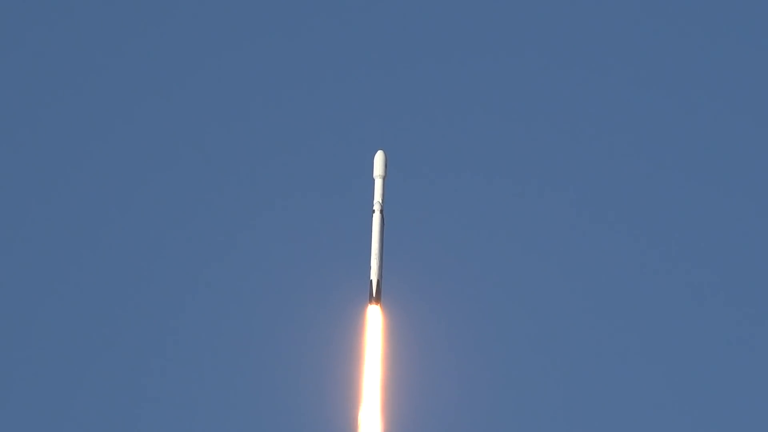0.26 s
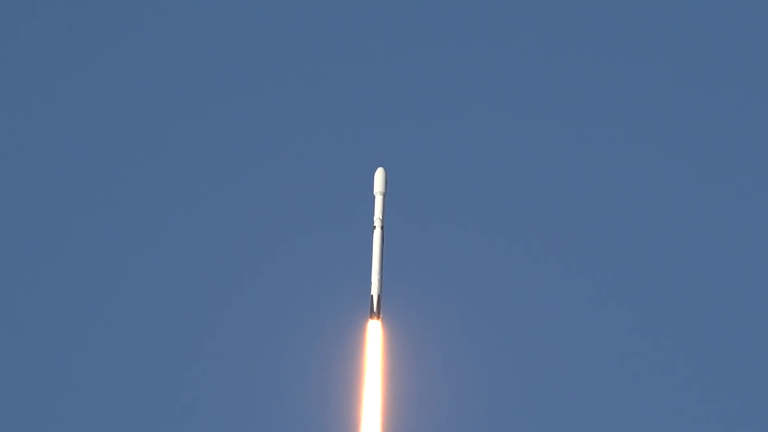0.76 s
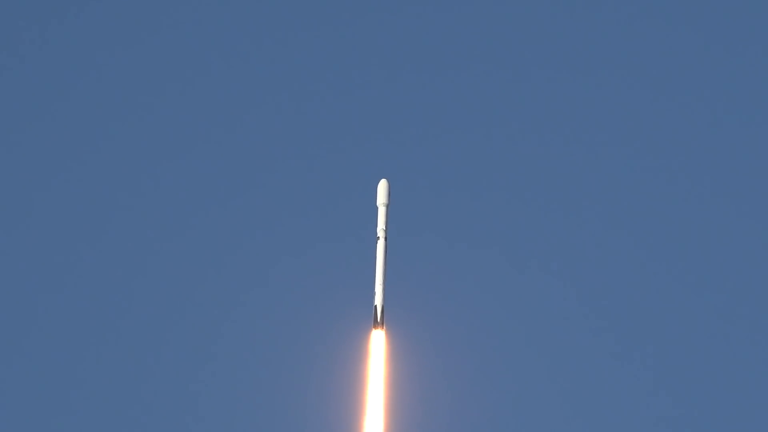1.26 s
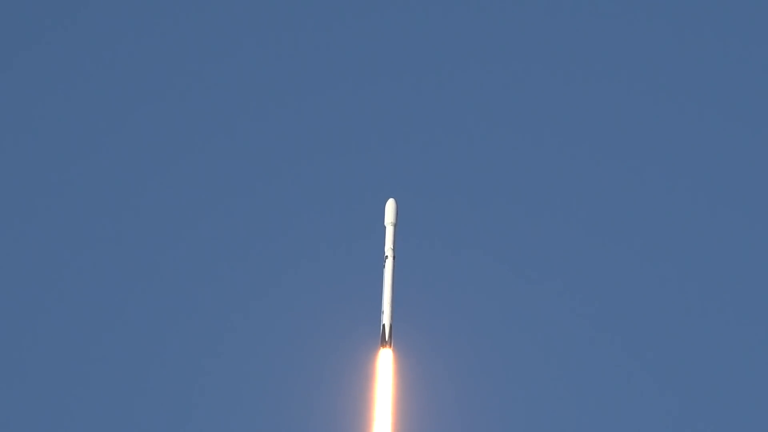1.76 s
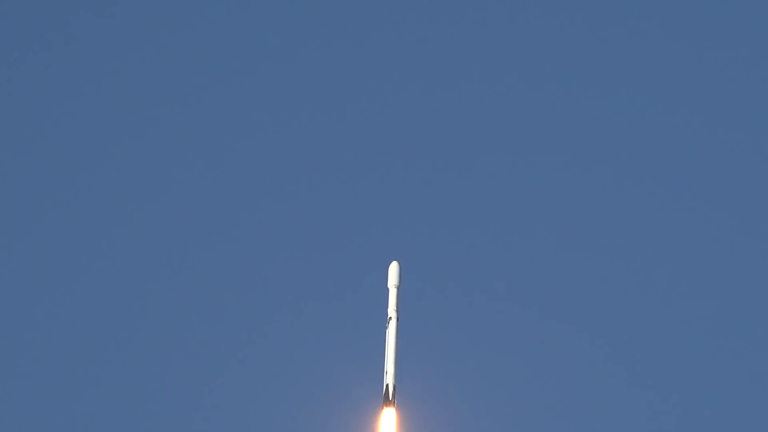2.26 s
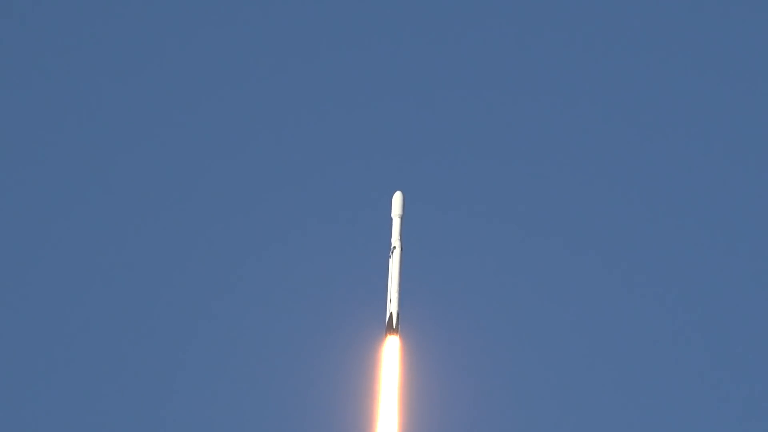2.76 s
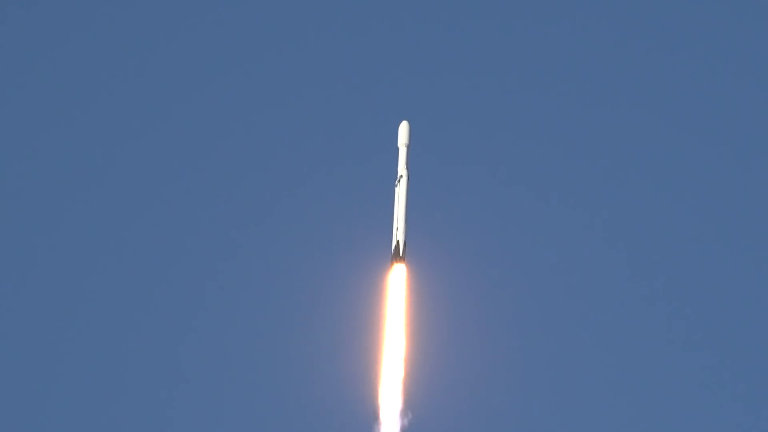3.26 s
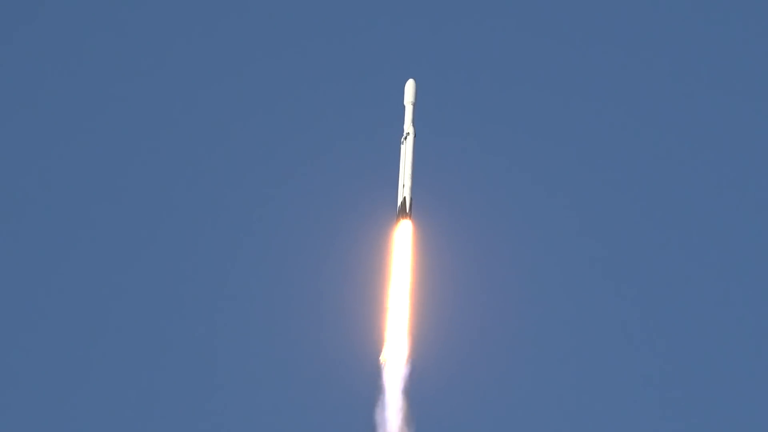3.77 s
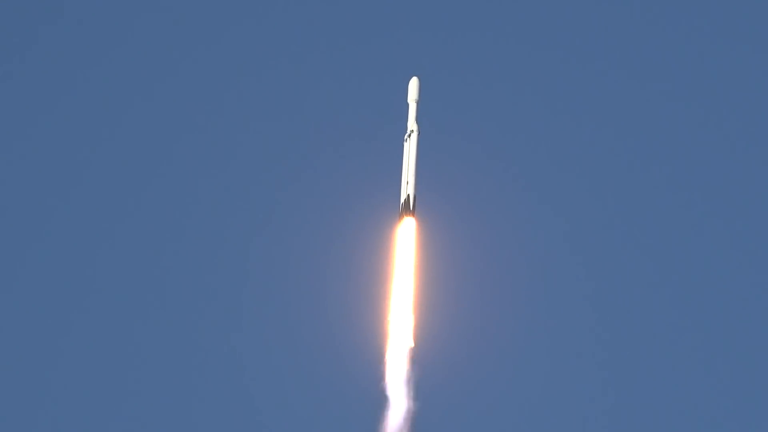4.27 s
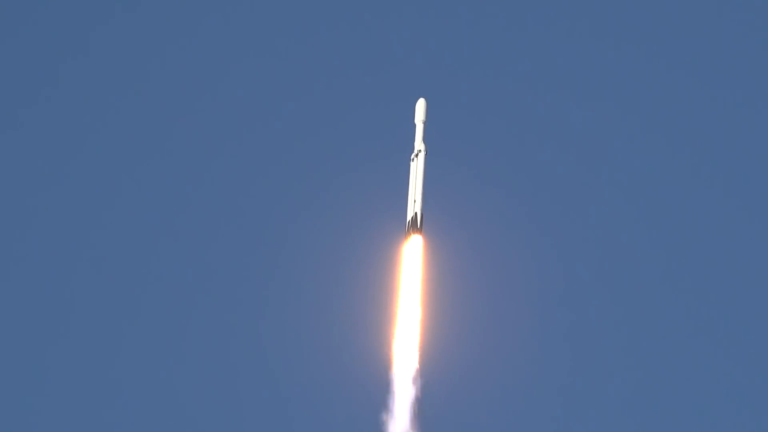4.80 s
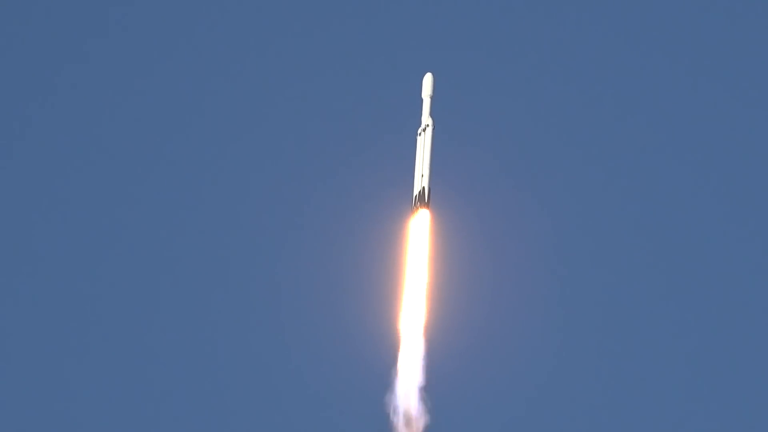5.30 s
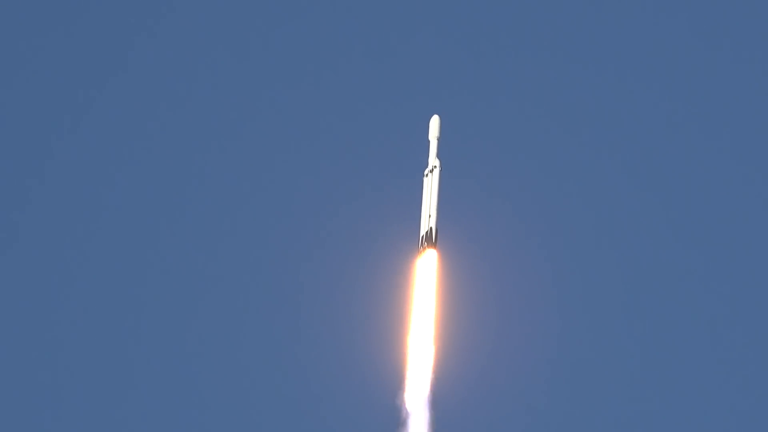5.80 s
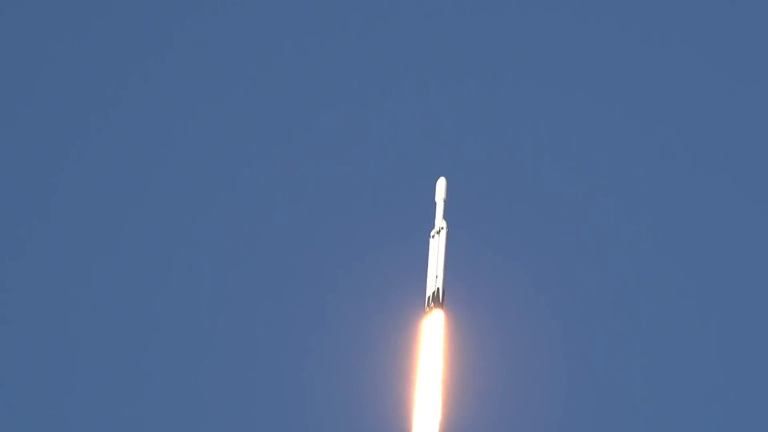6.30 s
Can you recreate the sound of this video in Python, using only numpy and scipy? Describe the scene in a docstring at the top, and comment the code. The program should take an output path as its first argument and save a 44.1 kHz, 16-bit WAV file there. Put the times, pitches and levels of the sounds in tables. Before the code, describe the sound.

A rocket climbs far away, its exhaust making a loud, deep, continuous rumble that throbs unevenly. Sharp crackles ride on top, fairly sparse after a few opening cracks, then thicker and brighter. Near the end they peak in a cluster of hard pops with a harsh rasp and faint sizzle, then ease slightly as the rumble carries on. The microphone is outdoors, kilometres away.

```python
"""Outdoors, kilometres from a rocket climbing into a clear sky.
Turbulence in the exhaust makes a deep, throbbing rumble. On the way, the steepest pressure crests
sharpen into shock fronts, which crackle more and more. Each front is followed by a fixed inverted echo
and by scatter from things nearby. Behind them lie a harsh rasp, a sizzling wash and two faint ticks."""
import sys
import numpy as np
from scipy import signal
from scipy.fft import rfft, irfft, next_fast_len
from scipy.io import wavfile
from scipy.ndimage import uniform_filter1d

SR = 44100
rng = np.random.default_rng(int(sys.argv[2]) if len(sys.argv) > 2 else 0)


def inscribe(sig):
    """Save sig as 16-bit PCM at rate SR to the path in sys.argv[1].

    A 1-D sig is mono; a 2-D sig holds one channel per row.
    Samples are clipped to [-1, 1] before scaling.
    """
    pcm = np.round(np.clip(np.atleast_2d(sig).T, -1, 1) * 32767)
    wavfile.write(sys.argv[1], SR, pcm.astype(np.int16))


N = 288716

# shocks heard as single cracks, relative levels: start_s, jump_db, rise_s, crest_db
STRONG_SHOCKS = [(0.0648, -20.0, 9.2e-05, -4.0), (0.1088, -17.5, 9.2e-05, -4.0),
                 (0.1455, -14.0, 8.2e-05, -2.0), (0.2449, -13.0, 8.7e-05, -0.5),
                 (0.2632, -25.0, 8.2e-05, -3.0), (0.4676, -24.0, 0.0001, -10.0),
                 (0.4875, -26.0, 0.00014, -5.0), (0.5631, -27.0, 0.0001, -16.0),
                 (0.6364, -18.5, 8.5e-05, -2.5), (0.7441, -27.0, 0.00012, -9.0),
                 (0.8216, -24.0, 0.00011, -16.0), (0.8345, -24.5, 9.8e-05, -6),
                 (0.8575, -18.5, 0.00012, -12.0), (0.9059, -25.0, 0.00012, -4.0),
                 (0.9995, -28.0, 0.0001, -1), (1.0295, -27.5, 0.0001, -2), (1.1093, -23.5, 0.00011, -7.0),
                 (1.3285, -26.0, 0.00011, -3), (1.3863, -22.5, 0.0001, -16.0),
                 (1.4264, -24.5, 0.00013, -10.0), (1.5054, -24.5, 0.00012, -14.0),
                 (1.6368, -23.0, 0.00011, -14.0), (1.6613, -23.5, 0.00013, -15.0),
                 (1.8359, -26.5, 0.00011, -4.0), (1.8979, -27.0, 8.2e-05, -11.0),
                 (1.9268, -26.5, 9.8e-05, -10.0), (1.9822, -22.5, 0.0001, -7.0),
                 (2.0859, -26.0, 0.00011, -16.0), (2.1405, -20.5, 9.2e-05, -3.0),
                 (2.1849, -25.0, 0.0001, -16.0), (2.2029, -23.5, 9.8e-05, -10.0),
                 (2.3376, -19.0, 9.2e-05, -6.0), (2.4106, -22.5, 0.0001, -16.0),
                 (2.4598, -22.5, 9.8e-05, -8.0), (2.5206, -21.5, 0.00012, -8.0),
                 (2.5512, -23.0, 8.7e-05, -8.0), (2.5915, -19.5, 8.2e-05, -4.0),
                 (2.6208, -22.5, 0.00012, -7.0), (2.6937, -25.0, 0.00012, -11.0),
                 (2.7099, -21.5, 9.2e-05, -14.0), (2.8054, -17.5, 6.5e-05, -5.0),
                 (2.8676, -21.0, 7.7e-05, -4.0), (2.9085, -21.0, 8.7e-05, -5.5),
                 (2.9278, -19.0, 9.8e-05, -3.5), (2.9755, -19.5, 9.8e-05, -8.0),
                 (3.1298, -19.0, 8.7e-05, -14.0), (3.1812, -24.0, 0.00011, -9.0),
                 (3.22, -19.0, 6.9e-05, -4.0), (3.2653, -23.0, 0.00012, -10.0),
                 (3.3164, -24.0, 0.00014, -8.0), (3.3419, -13.0, 7.7e-05, -3.0),
                 (3.3767, -19.5, 7.3e-05, -7.0), (3.4117, -23.5, 5.1e-05, -6.0),
                 (3.4398, -18.0, 8.2e-05, -5.0), (3.4749, -18.0, 6.9e-05, -5.0),
                 (3.5197, -18.0, 7.3e-05, -5.0), (3.5581, -23.0, 0.00012, -8.0),
                 (3.5747, -13.5, 5.7e-05, -5.0), (3.6286, -24.5, 0.00011, -10.0),
                 (3.6934, -19.5, 9.8e-05, -10.0), (3.7254, -22.0, 0.00012, -8.0),
                 (3.8102, -17.5, 7.7e-05, -4.0), (3.8682, -14.0, 3.2e-05, -1.0),
                 (3.8911, -14.5, 4.3e-05, -7.0), (3.9676, -20.0, 8.7e-05, -7.0),
                 (4.0056, -19.0, 0.00014, -9.0), (4.049, -21.5, 8.2e-05, -13.0),
                 (4.0672, -19.5, 0.0001, -9.0), (4.1211, -22.5, 8.2e-05, -11.0),
                 (4.1483, -20.0, 7.3e-05, -4.0), (4.2134, -19.0, 4.5e-05, -5.0),
                 (4.2598, -23.0, 6.9e-05, -7.0), (4.2954, -20.0, 6.5e-05, -4.0),
                 (4.3198, -18.0, 7.7e-05, -8.0), (4.4085, -15.0, 5.7e-05, 0.0),
                 (4.5098, -15.0, 5.1e-05, -2.0), (4.5573, -21.5, 8.2e-05, -8.0),
                 (4.6027, -17.5, 6.1e-05, -6.0), (4.62, -19.5, 8.2e-05, -8.0),
                 (4.6938, -18.5, 0.0001, -3.0), (4.7301, -16.0, 8.7e-05, -4.0),
                 (4.7525, -11.5, 3.8e-05, -1.0), (4.7788, -10.5, 5.7e-05, -3.0),
                 (4.8104, -17.5, 5.7e-05, -3.0), (4.8515, -25.0, 7.3e-05, -6.0),
                 (4.8903, -14.5, 0.0001, -3.0), (4.9205, -17.0, 6.9e-05, -6.0),
                 (4.9559, -20.5, 0.00014, -16.0), (4.9719, -19.5, 0.00014, -8.0),
                 (4.9874, -16.0, 0.00014, -10.0), (5.0571, -26.0, 0.00014, -10.0),
                 (5.0992, -5.5, 0.00014, -2.0), (5.1689, -6.3, 4.6e-05, -1.0),
                 (5.1996, -16.5, 6.5e-05, -2.0), (5.2286, -14.0, 7.7e-05, -5.0), (5.3505, -9, 0.0001, -3.0),
                 (5.384, -9, 0.0001, -3.0), (5.411, -19.5, 5.7e-05, -10.0), (5.4563, -9.5, 0.00012, -4.0),
                 (5.4837, -8.5, 0.00012, -5.0), (5.5492, -5.0, 0.00012, 0.0),
                 (5.5675, -16.0, 9.2e-05, -8.0), (5.6171, -20.0, 0.00014, -16.0),
                 (5.6376, -18.5, 5.4e-05, -4.0), (5.6909, -20.5, 0.00011, -10.0),
                 (5.7251, -10.3, 0.00014, -5.0), (5.801, -18.0, 7.3e-05, -7.0),
                 (5.8445, -19.5, 0.00011, -11.0), (5.911, -15.5, 6.5e-05, -2.0),
                 (5.9719, -14.5, 0.00011, -3.0), (5.9926, -19.0, 8.2e-05, -5.0),
                 (6.022, -16.3, 6.1e-05, -3.0), (6.1004, -16.5, 7.5e-05, -6.0),
                 (6.1309, -21.0, 7.3e-05, -5.0), (6.1483, -18.5, 7.7e-05, -11.0),
                 (6.2247, -21.5, 0.00014, -6.0), (6.2699, -20.0, 4.8e-05, -4.0),
                 (6.3142, -18.5, 5.1e-05, -3.0), (6.3548, -19.0, 3.4e-05, -3.0),
                 (6.436, -21.0, 6.9e-05, -10.0), (6.4659, -21.0, 0.0001, -7.0),
                 (6.5076, -22.0, 9.8e-05, -7.0)]
# relative strength of the small shocks: time_s, level_db
CRACKLE_LEVEL = [(0, -53), (.45, -52), (1.25, -53.3), (1.75, -50.8), (2.3, -49.3), (3.15, -49.8),
                 (3.7, -49.5), (4.45, -49), (4.9, -46.3), (5.4, -45.2), (5.75, -46.3), (6.05, -47.5),
                 (6.3, -46), (6.55, -46.5)]
COMB_ECHO_DELAY_S = .0072


def rumble(lumps):
    """Large eddies throb, smaller ones roar and flutter; returns (sub-bass plus boom, roar)."""
    levels = [(0, -17.5, -16.5, -28.5), (0.5, -16.5, -14.3, -28), (1.25, -20, -17, -27.5),
              (1.75, -18.5, -17, -25.8), (2.3, -16.5, -18.5, -26.3), (2.8, -18, -18.7, -25.8),
              (3.15, -20, -19.3, -26), (3.65, -18, -21.5, -22.7), (4.1, -16.5, -22.5, -24.5),
              (4.55, -14, -21, -24.5), (5.3, -14.3, -19, -22.7), (6.1, -12.7, -21.3, -25.5),
              (6.55, -13, -21, -25.5)]   # slow course: time_s, sub_db, boom_db, roar_db
    eddy_bursts = [(0.26, 5), (0.5, 3), (0.65, 5), (1.02, 5), (1.34, 4), (1.52, 4), (1.64, 4), (2.14, 4),
                   (2.38, 4), (2.92, 5), (3.86, 4), (4.52, 4), (4.75, 4), (5.18, 5), (5.56, 5), (5.99, 5),
                   (6.38, 4)]   # single throbs: centre_s, swell_db
    deepening = [(0, .12), (2.5, .3), (4.5, .55), (6.55, .65)]   # sub-bass sinks with the climb: time_s, low_band_share
    boom_rise = [(0, .33), (3.2, .35), (3.7, .4), (4.25, .15), (4.8, .5), (5.2, .58), (5.8, .42),
                 (6.55, .42)]   # boom moves up as the crackle peaks: time_s, high_band_share
    boom_focus = [(0, .2), (.4, .55), (1.1, .55), (1.9, .2), (2.6, 0), (6.55, 0)]   # one pitch while the rocket is low: time_s, narrow_band_share
    opening = [(0, .28), (1.3, .25), (2.5, .33), (3.2, .5), (4.2, .42), (5.2, .3), (6.55, .24)]   # plume turns towards the listener: time_s, high_band_share
    sub_db, boom_db, roar_db = in_time(levels)
    centre_s, peak_db = np.transpose(eddy_bursts)
    swell_db = bumps(centre_s, peak_db, half_widths_s=.021)
    upper_sub = turbulence(39, 72, side_db=-17, steady_s=.13)
    lower_sub = turbulence(16, 39, side_db=-18, steady_s=.13)
    sub = blend(upper_sub, lower_sub, deepening)
    boom = blend(turbulence(72, 125, side_db=-13.5), turbulence(125, 195, side_db=-13.5), boom_rise)
    boom = blend(boom, turbulence(101, 119, side_db=-15), boom_focus) * np.sqrt(lumps)
    roar = blend(turbulence(185, 300, side_db=-15), turbulence(300, 490, side_db=-17), opening) * lumps
    deep = from_db(sub_db + swell_db) * sub + from_db(boom_db + swell_db) * boom
    return deep, from_db(roar_db + .6 * swell_db) * roar


def turbulence(low_hz, high_hz, side_db, steady_s=.07):
    """One range of eddy sizes in the plume: a noise band whose slow level is 1."""
    spectrum = [(8.2, -35), (14, -5), (43, 0), (107, -5), (229, -14), (312, -16), (444, -24), (526, -37),
                (560, -36), (730, -66), (1230, -120)]   # plume noise: frequency_hz, density_db
    points_hz, density_db = np.transpose(spectrum)
    size = next_fast_len(N, real=True)
    hz = np.maximum(np.fft.rfftfreq(size, 1 / SR), 1)
    colour = from_db(np.interp(np.log(hz), np.log(points_hz), density_db))
    band = 1 / np.sqrt((1 + (low_hz / hz) ** 16) * (1 + (hz / high_hz) ** 16))
    noise = irfft(rfft(stereo_noise(side_db), size) * colour * band, size)[:, :N]
    slow_power = uniform_filter1d(np.mean(noise ** 2, axis=0), int(steady_s * SR))
    return noise / np.sqrt(slow_power + 1e-20)


def flutter(rate_hz, depth_db):
    """Quick lumps of loudness as single eddies burst; mean power 1."""
    wobble = rms_one(cut(rng.standard_normal(N), rate_hz, "low"))
    return rms_one(from_db(depth_db * wobble))


def pressure_crests(trim_db=-1.2, lag_s=.0007, lull_s=.004):
    """Under each strong shock: a lull, the crest, a hump from a near reflection, then a trough."""
    # the wave lengthens and sharpens with the climb: time_s, hump_s, trough_s, half_width_s, trough_db
    wave_shape = [(0, .0018, .0056, .0015, -1.5), (2.6, .0022, .006, .0013, -6),
                  (3.6, .003, .0095, .00125, -8), (4.5, .0036, .0115, .001, -5.5),
                  (5.1, .0052, .0133, .00095, -5), (6, .0056, .014, .0008, -6),
                  (6.5, .0058, .0145, .00085, -7)]
    start_s, _, _, crest_db = np.transpose(STRONG_SHOCKS)
    height = from_db(crest_db + trim_db)
    onsets = (start_s * SR).astype(int)
    hump_s, trough_s, half_width_s, trough_db = (curve[onsets] for curve in in_time(wave_shape))
    lull = bumps(start_s - lull_s, height * from_db(-15), lull_s)
    crest = bumps(start_s + lag_s, height, half_width_s)
    hump = bumps(start_s + hump_s, height * from_db(-4.5), 1.3 * half_width_s)
    trough = bumps(start_s + trough_s, height * from_db(trough_db), .27 * trough_s)
    return cut(crest - lull + hump - trough, 14, "high", order=1)


def exhaust(lumps, takeover_rms=.24):
    """Each high crest is one wave of the rumble itself: it displaces the deep noise around it."""
    crests = pressure_crests()
    crest_power = uniform_filter1d(crests ** 2, SR // 40)
    deep, roar = rumble(lumps)
    return crests + roar + deep / np.sqrt(1 + crest_power / takeover_rms ** 2)


def strong_shocks(paths=5):
    """Fronts from different parts of the plume scatter along different paths."""
    return sum(surroundings(cracks(STRONG_SHOCKS[k::paths])) for k in range(paths))


def cracks(shocks, typical_rise_s=7e-5, steep_rise_s=1.2e-5):
    """Thin shock fronts: the shorter the rise, the brighter the crack."""
    steepening = [(0, -7), (1.5, -9), (2.3, -8), (3.2, -1), (3.7, 0), (5.3, 0), (6, -5), (6.55, -3)]   # fronts sharpen with the climb: time_s, steep_gain_db
    start_s, jump_db, rise_s, _ = np.transpose(shocks)
    jumps = fronts(start_s, from_db(jump_db), rise_s, relax_s=.003)
    # the highest fronts steepen most: part of their jump is almost instant
    climb_db = in_time(steepening)[0][(start_s * SR).astype(int)]
    steep_db = jump_db - 29 + 1.1 * (jump_db + 20) + climb_db
    steep_height = from_db(steep_db) * typical_rise_s / rise_s
    steep_parts = fronts(start_s, steep_height, steep_rise_s, relax_s=.003)
    return cut(jumps + steep_parts, 640, "high", order=1)


def fronts(starts_s, heights, rises_s, relax_s, swing_hz=40):
    """Pressure jumps in an S-shaped step, then sinks through a trough back to rest."""
    out, lead = np.zeros(N + SR), int(.004 * SR)
    t = (np.arange(SR // 25) - lead + .5) / SR
    after_s = np.maximum(t, 0)
    fall = np.exp(-after_s / relax_s) * np.cos(2 * np.pi * swing_hz * after_s)
    fall *= np.minimum(1, 2 * (1 - t / t[-1])) ** 2
    for start_s, height, rise_s in np.broadcast(starts_s, heights, rises_s):
        start = int(start_s * SR)
        out[start:start + len(t)] += height * fall * (1 + np.tanh(t / rise_s)) / 2
    return out[lead:lead + N]


def small_shocks(paths=3):
    """Weak fronts from several parts of the plume, each stream with its own scatter."""
    streams = (surroundings(cut(shock_stream(), 250, "high", order=1)) for _ in range(paths))
    return sum(streams) / np.sqrt(paths)


def shock_stream(rate_per_s=60, spread_db=4.5, trim_db=-3):
    """Dense random weak fronts, steeper when they are large or the crackle is strong."""
    level_db, = in_time(CRACKLE_LEVEL)
    waits, sizes = -np.log(1 - rng.random((4000, 2)).T)   # exponential draws
    start_s = np.cumsum(waits) / rate_per_s
    inside = start_s < N / SR
    start_s, sizes = start_s[inside], np.minimum(sizes[inside], 2.2)
    vigour_db = level_db[(start_s * SR).astype(int)]
    base_rise_s = 1.05e-4 - 4.5e-6 * (vigour_db - np.median(vigour_db))
    rise_s = np.clip(base_rise_s * from_db(-1.2 * (sizes - 2)), 4e-5, 4e-4)
    stream = fronts(start_s, from_db(spread_db * sizes), rise_s, relax_s=.002)
    mid_power = uniform_filter1d(cut(stream, [700, 3000], "band") ** 2, SR // 5)
    return from_db(level_db + trim_db) * stream / np.sqrt(mid_power + 1e-12)


def sputter(mean_per_s=170, spread_db=3):
    """Tiny steep fronts come in clumps and tear the treble between the cracks."""
    levels = [(0, -90), (.55, -84), (.9, -98), (3, -94), (4.2, -86), (4.9, -77.5), (5.4, -75.5), (5.8, -79),
              (6.3, -75), (6.55, -77)]   # fine sputter: time_s, level_db
    rate_per_s = mean_per_s * flutter(rate_hz=14, depth_db=2.8) ** 2
    hits = rng.random(N) < rate_per_s / SR
    heights = from_db(spread_db * np.minimum(rng.exponential(1, N), 2.5))
    clicks = cut(cut(hits * heights, 3000, "high"), 4500, "low")
    return from_db(in_time(levels)[0]) * rms_one(clicks)


def rasp(band_hz=(520, 760)):
    """The roar's harsh upper edge, swelling when the crackle is strongest."""
    levels = [(0, -56), (2.7, -55), (3.5, -62), (4.3, -62), (4.8, -51), (5.3, -42.5), (5.7, -44),
              (6.1, -49), (6.55, -49)]   # harsh edge: time_s, level_db
    noise = with_comb_echo(cut(stereo_noise(side_db=-6), band_hz, "band"))
    return from_db(in_time(levels)[0]) * rms_one(noise)


def far_wash(trim_db=-6, air_db=-95.5):
    """Crackle scattered over the land merges into a wash, with clumps of sizzle and faint air hiss."""
    sizzle_levels = [(0, -75), (.7, -83), (1.25, -91), (1.8, -82), (3.3, -76), (4.25, -69), (5.25, -66),
                     (5.75, -67.5), (6.55, -65.5)]   # treble between the cracks: time_s, level_db
    wash = cut(stereo_noise(side_db=-12), 520, "high")
    wash = cut(cut(wash, 500, "low", order=1), 3100, "low", order=5)
    wash = from_db(in_time(CRACKLE_LEVEL)[0] + trim_db) * rms_one(with_comb_echo(wash))
    sizzle = cut(cut(stereo_noise(side_db=-3), 3000, "high"), 4000, "low", order=3)
    sizzle *= flutter(rate_hz=45, depth_db=3)
    air = cut(stereo_noise(side_db=-3), 8000, "low", order=1)
    return wash + from_db(in_time(sizzle_levels)[0]) * rms_one(sizzle) + from_db(air_db) * rms_one(air)


def ticks(trim_db=-1, t60_s=.015):
    """Tiny bright clicks close by."""
    clicks = [(0.4713, -50), (0.5721, -56)]   # noise bursts: start_s, level_db
    out, t = np.zeros(N), np.arange(SR // 50) / SR
    for start_s, level_db in clicks:
        start = int(start_s * SR)
        envelope = from_db(level_db + trim_db - 60 * t / t60_s)
        out[start:start + len(t)] += envelope * rng.standard_normal(len(t))
    return cut(out, [4500, 11500], "band")


def surroundings(x, scatter_s=.004, scatter_width_s=.0045, tail_t60_s=.085):
    """The direct wave and its comb echo, ragged scatter from things nearby, and a short tail."""
    # sound from the low rocket grazes the land, so scatter takes over: time_s, direct_db, near_db, late_db
    grazing = [(0, -4.5, 4.5, 8), (1.5, -3, 3.5, 7), (2.7, -.5, 1.5, 5.5), (3.5, 1, -.8, 2),
               (4.3, 1, -1.2, .5), (5.2, -.2, -2, -1.5), (5.7, -1, 0, 1.5), (6.55, -2, 0, 2.5)]
    direct, near, late = (x * from_db(level_db) for level_db in in_time(grazing))
    t = np.arange(SR // 6) / SR
    cluster = np.exp(-((t - scatter_s) / scatter_width_s) ** 2)
    decay = from_db(-60 * t / tail_t60_s) * (t > COMB_ECHO_DELAY_S)
    scatter = from_db([[-4.8], [-7]]) * echo_cloud(cluster, [470, 8500], side_db=-6)
    tail = from_db(-13.3) * echo_cloud(decay, [450, 5500], side_db=-6)
    return with_comb_echo(direct) + convolve(near, scatter) + convolve(late, tail)


def with_comb_echo(x, echo_db=(-5, -10)):
    """The direct wave plus a fixed inverted echo after 7.2 ms, which combs the spectrum."""
    t = np.arange(SR // 50) / SR
    impulse = 1.0 * (np.arange(len(t)) == round(COMB_ECHO_DELAY_S * SR))
    echo = -cut(impulse, [240, 5500], "band", order=1)
    # the echo's treble is smeared
    smear = echo_cloud(np.exp(-((t - COMB_ECHO_DELAY_S) / .0007) ** 2), [3500, 14000], side_db=-1)
    response = from_db(echo_db)[:, None] * (echo + from_db(.5) * smear)
    response[:, :2] += np.eye(2)   # direct wave, one sample sooner on the left
    return convolve(x, response)


def echo_cloud(envelope, band_hz, side_db):
    """Many small echoes under an envelope; energy 1 a side."""
    cloud = cut(stereo_noise(side_db, size=len(envelope)) * envelope, band_hz, "band")
    return cloud / np.linalg.norm(cloud, axis=1, keepdims=True)


def local_colour(x):
    """The listening spot adds resonant peaks and dips, different on each side."""
    resonances = [(520, 60, -2, -2), (608, 140, 7.6, 2.6), (920, 300, -3.4, -1.8), (2050, 600, 1.7, 2.2),
                  (4800, 1200, 2.0, -2.8)]   # peaks and dips: centre_hz, width_hz, left_db, right_db
    for centre_hz, width_hz, *gains_db in resonances:
        b, a = signal.iirpeak(centre_hz, centre_hz / width_hz, fs=SR)
        x = x + (from_db(gains_db)[:, None] - 1) * signal.lfilter(b, a, x)
    return x


def stereo_noise(side_db, size=N):
    """White noise, mostly common to both ears."""
    mid, side = rng.standard_normal((2, size))
    return mid + from_db(side_db) * side * np.array([[1], [-1]])


def bumps(centres_s, heights, half_widths_s):
    """A sum of bell-shaped bumps."""
    out = np.zeros(N)
    for centre_s, height, half_s in np.broadcast(centres_s, heights, half_widths_s):
        first, end = int((centre_s - 4 * half_s) * SR), int((centre_s + 4 * half_s) * SR)
        span = np.arange(max(first, 0), min(end, N))
        out[span] += height * np.exp(-((span / SR - centre_s) / half_s) ** 2)
    return out


def blend(first, second, share_rows):
    """Cross-fade two unrelated noises; the rows give the second's share of the power."""
    share = np.clip(in_time(share_rows)[0], 0, 1)
    return np.sqrt(1 - share) * first + np.sqrt(share) * second


def in_time(rows):
    """Each column of a curve table at every sample."""
    time_s, *columns = np.transpose(rows)
    return [np.interp(np.arange(N) / SR, time_s, column) for column in columns]


def convolve(x, response):
    """Pass a signal through a stereo impulse response."""
    return signal.oaconvolve(np.atleast_2d(x), response, axes=1)[:, :N]


def cut(x, hz, kind, order=2):
    """Causal low-, high- or band-pass."""
    return signal.sosfilt(signal.butter(order, hz, kind, fs=SR, output="sos"), x + 1e-18)


def rms_one(x):
    """Scale to an rms of 1."""
    return x / np.sqrt(np.mean(x ** 2) + 1e-20)


def from_db(db):
    """Decibels to gain."""
    return 10 ** (np.asarray(db) / 20)


def scene():
    """Rumble and crackle, a little to the left."""
    lumps = flutter(rate_hz=40, depth_db=2.8)   # shared by rumble, rasp and wash
    crackle = strong_shocks() + rasp() * lumps + small_shocks() + surroundings(sputter())
    crackle += far_wash() * np.sqrt(lumps) * flutter(rate_hz=25, depth_db=2.2)
    return (local_colour(crackle) + exhaust(lumps) + ticks()) * from_db([[.1], [-.4]])


def record(dry):
    """A 4 ms fade-in, crests rounded off at full scale, and a cut above 17 kHz."""
    faded = dry * np.minimum(np.arange(N) / (.004 * SR), 1)
    rounded = faded / (1 + faded ** 8) ** (1 / 8)
    return signal.sosfilt(signal.cheby2(12, 70, 17000, fs=SR, output="sos"), rounded)


dry = scene()
out = record(dry)
inscribe(out)
```